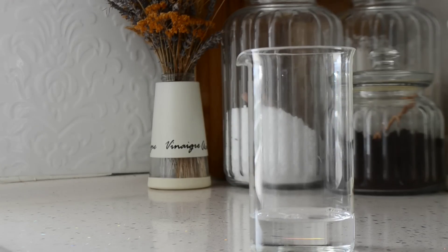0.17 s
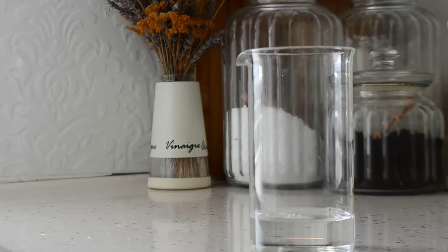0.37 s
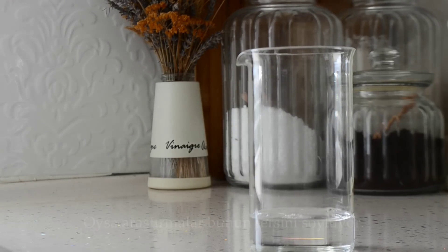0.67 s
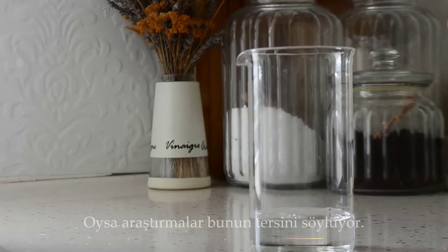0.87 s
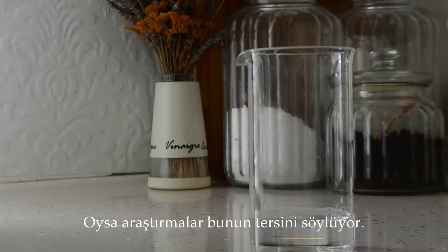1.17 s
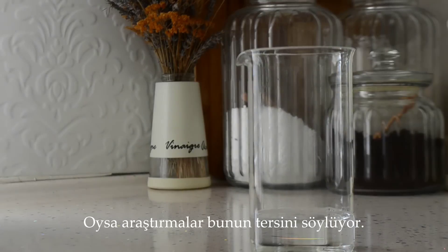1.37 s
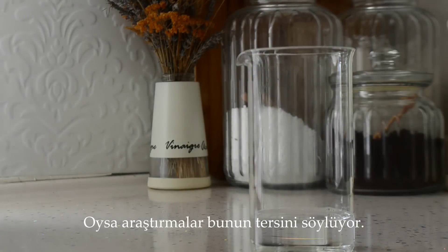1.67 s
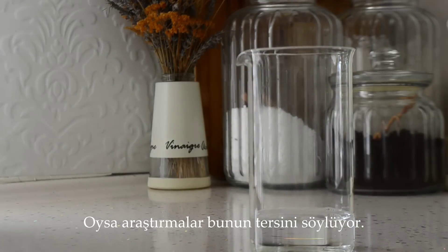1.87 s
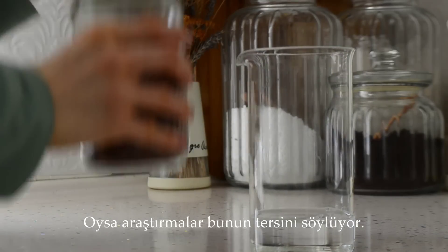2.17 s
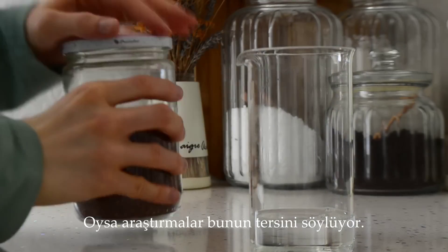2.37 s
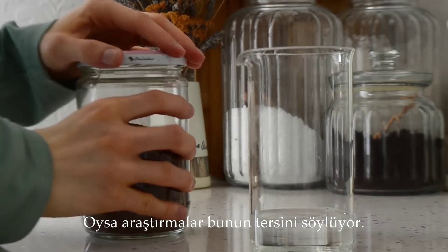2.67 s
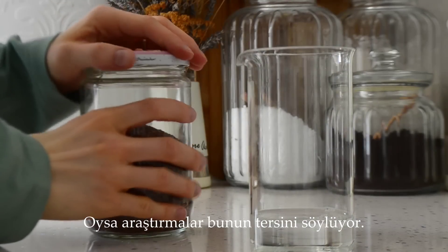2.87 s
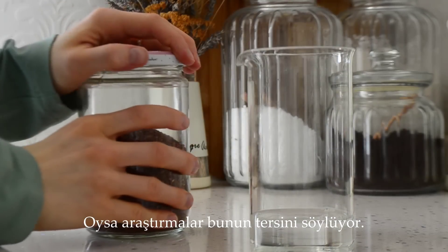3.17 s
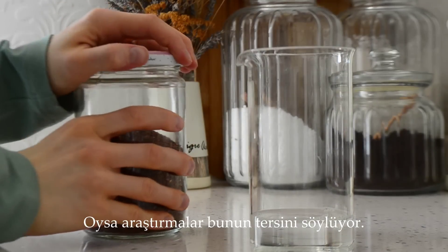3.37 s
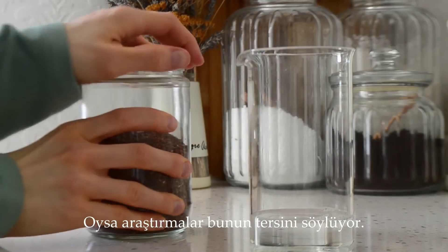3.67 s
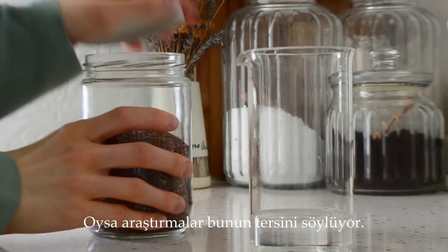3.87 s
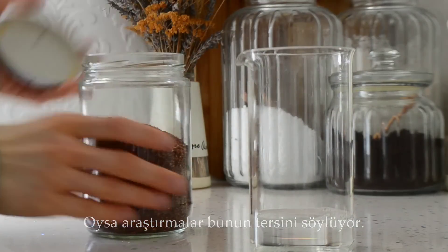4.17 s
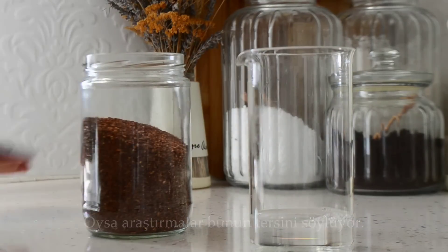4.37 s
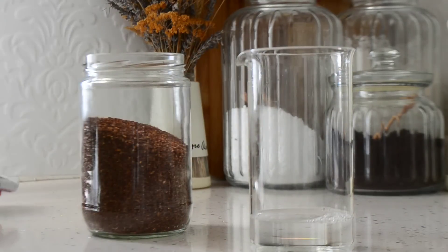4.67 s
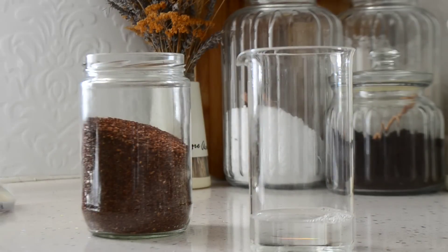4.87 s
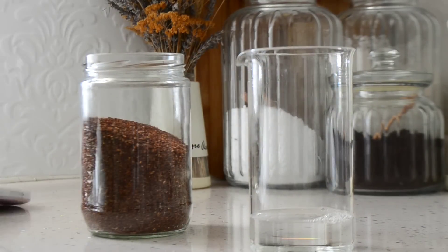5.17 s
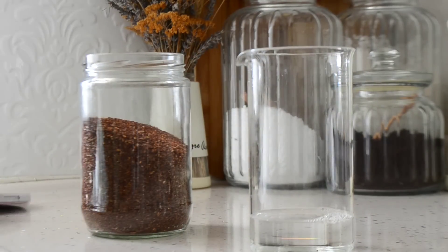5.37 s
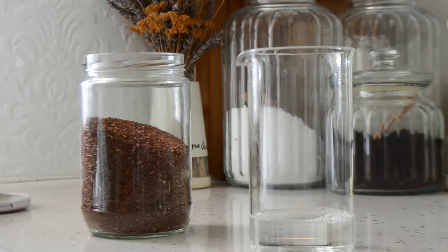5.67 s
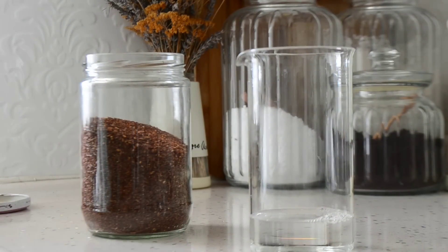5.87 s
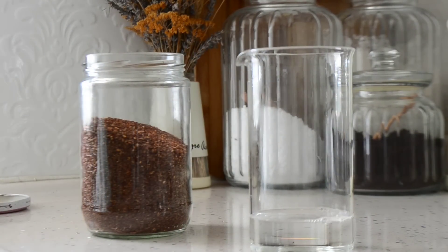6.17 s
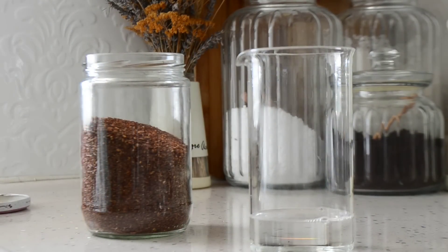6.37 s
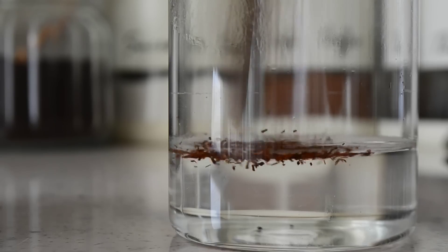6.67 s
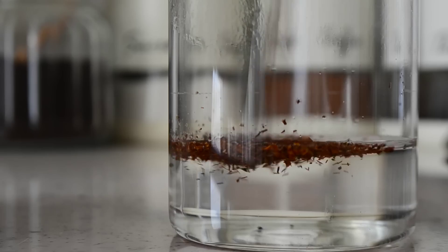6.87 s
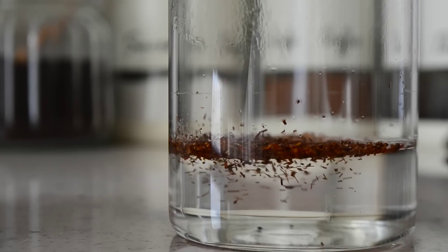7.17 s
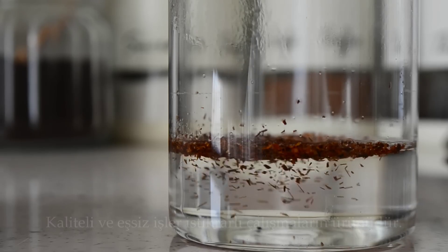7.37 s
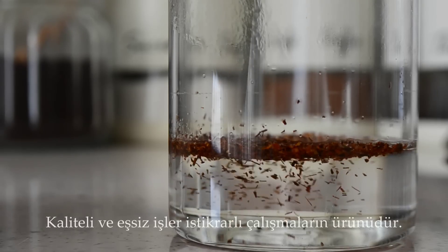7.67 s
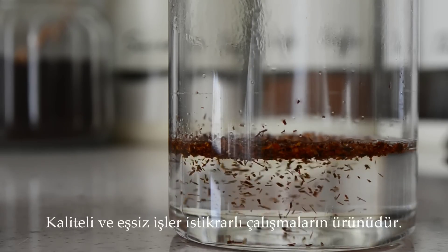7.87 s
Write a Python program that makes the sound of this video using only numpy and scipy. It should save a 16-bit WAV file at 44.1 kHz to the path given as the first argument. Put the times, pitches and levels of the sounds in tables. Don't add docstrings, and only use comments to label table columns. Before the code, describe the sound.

In a quiet kitchen, a jar drags and thuds onto a stone counter, a lid spins down rattling, and flakes patter softly in a glass jug.

```python
import sys
import numpy as np
from scipy import signal
from scipy.fft import rfft, irfft
from scipy.io import wavfile
from scipy.ndimage import uniform_filter1d

SR = 44100
rng = np.random.default_rng(int(sys.argv[2]) if len(sys.argv) > 2 else 0)


def master_out(mix):
    frames = np.transpose(np.atleast_2d(mix))
    ceiling = np.clip(frames, -1, 1)
    pcm = np.round(ceiling * 32767).astype(np.int16)
    wavfile.write(sys.argv[1], SR, pcm)


def volts_from_db(level):
    exponent = np.asarray(level, float) / 20
    return 10 ** exponent


N = 353108
T = np.arange(N) / SR


def level(x, db=0):
    return x * volts_from_db(db) / np.sqrt(np.mean(x ** 2))


def peak(x, db):
    return x * volts_from_db(db) / np.abs(x).max()


def add(out, start_s, x):
    i = int(start_s * SR)
    out[i:i + len(x)] += x


def on_log(hz, table):
    table_hz, value = np.transpose(table)
    return np.interp(np.log(hz + 1), np.log(table_hz), value)


def colour(x, table):
    cepstrum = irfft(np.log(volts_from_db(on_log(np.fft.rfftfreq(4096, 1 / SR), table))))
    cepstrum[1:2048] *= 2
    cepstrum[2049:] = 0
    response = irfft(np.exp(rfft(cepstrum)))
    return signal.oaconvolve(x, response)[:len(x)]


def band(x, lo_hz, hi_hz, order=2):
    edges_hz = [lo_hz, min(hi_hz, .48 * SR)]
    return signal.sosfilt(signal.butter(order, edges_hz, "band", fs=SR, output="sos"), x)


def ring(x, modes):
    t = T[:SR // 2]
    tone = sum(volts_from_db(db) * np.sin(2 * np.pi * hz * t) * volts_from_db(-60 * t / max(t60, .004)) for hz, db, t60 in modes)
    return signal.oaconvolve(x, tone)[:len(x)]


def as_modes(peaks):
    return [(hz, db + 20 * np.log10(width), np.log(1000) / (np.pi * width)) for hz, width, db in peaks]


def curve(table):
    time_s, level_db = np.transpose(table)
    first, last = time_s[0], time_s[-1]
    fade = np.interp(T, [first, first + .02, last - .02, last], [0, 1, 1, 0])
    return fade * volts_from_db(np.interp(T, time_s, level_db))


def swell(start, end, db, rise, fall):
    before = (start - T) / max(rise, .005)
    after = (T - end) / max(fall, .005)
    return volts_from_db(db - 20 * np.maximum(np.maximum(before, after), 0))


def strokes(table):
    return sum(swell(s, s, db, rise, fall) for s, db, rise, fall in table)


def grains(rate, spread_db):
    size_db = spread_db * np.minimum(rng.exponential(size=N), 2.5)
    return level((rng.random(N) < rate / SR) * rng.standard_normal(N) * volts_from_db(size_db))


def walk(rate):
    k = int(SR / rate)
    steps = np.repeat(rng.standard_normal(N // k + 1), k)
    return 1.3 * uniform_filter1d(uniform_filter1d(steps, k), k)[:N]


def jar():
    # time_s, level_db
    jar_blows = [
        (2.5722, 5),
        (2.5765, -2),
        (2.585, -5.5),
        (2.598, -17.5),
        (2.625, -8),
    ]
    # pitch_hz, level_db, t60_s
    slab_modes = [(626, -11, 0.17), (732, 4.5, 0.27), (930, -6.5, 0.28), (1106, -13.5, 0.33),
                  (1178, 2, 0.35), (1267, -0.5, 0.21), (1436, -5.5, 0.37), (1407, 0, 0.44),
                  (1560, -4.5, 0.59), (1670, -2.5, 0.23), (1970, -16.5, 0.36), (2090, -5, 0.26),
                  (2762, -22, 0.23)]
    # pitch_hz, level_db, t60_s
    glass_modes = [(6940, -63, .12), (8220, -60.5, .12), (10450, -65, .1), (13300, -75, .1)]
    # pitch_hz, level_db
    knock_spectrum = [(40, -33), (62, -7), (120, -21), (300, -6.5), (520, -3), (760, 5.5), (1000, -2.5),
                      (1350, -1.5), (1900, -6.5), (2700, -13.5), (3300, -27.5), (6300, -55.5),
                      (15500, -73.5)]
    blows, t = np.zeros(N), T[:SR // 20]
    for s, db in jar_blows:
        after_push = 0.14 * rng.standard_normal(len(t)) * np.exp(-t / 0.0043)
        add(blows, s, volts_from_db(db) * ((t == 0) + after_push))
    damped = [(hz, db, 0.14 * t60) for hz, db, t60 in slab_modes]
    slab_ring = peak(ring(band(blows, 400, 1700), damped), -5)
    glass_ring = ring(peak(blows, -8), glass_modes)
    return slab_ring + glass_ring + peak(colour(blows, knock_spectrum), -1.6)


def drag():
    # time_s, level_db
    pressure = [
        (1.33, -51),
        (1.346, -36.5),
        (1.502, -17),
        (1.576, -28),
        (1.62, -37.5),
        (1.68, -61),
    ]
    # pitch_hz, width_hz, level_db
    shelf = [(142, 43, -2.5), (262, 37, -13), (356, 140, 7), (542, 45, 8), (624, 110, 2), (790, 150, -9.5),
             (1150, 130, -15), (1620, 130, -32), (2600, 360, -27)]
    shelf_modes = as_modes(shelf)
    slips_per_s = 160 * volts_from_db(3 * walk(60))
    slip_db = 5.2 * np.clip(rng.standard_normal(N), -2, 1)
    slips = np.diff(np.floor(np.cumsum(slips_per_s) / SR), prepend=0) * volts_from_db(slip_db)
    hiss = 0.068 * rng.standard_normal(N)
    push = level(band(slips + hiss, 163, 2480, order=3)) * curve(pressure)
    unit_ring = np.linalg.norm(ring(1. * (T == 0), shelf_modes))
    return volts_from_db(-4) * ring(push, shelf_modes) / unit_ring / 3.55


def knocks():
    # time_s, peak_db, body_hz, body_width_octaves
    shelf_knocks = [(0.843, -37.5, 2000, 1.8), (1.177, -25, 266, 1.4), (1.179, -40, 736, 1.5),
                    (1.342, -34.5, 456, 1.6), (1.391, -33, 630, 0.71), (1.519, -19.5, 580, 1),
                    (1.552, -38.5, 2170, 1.6), (1.694, -49, 2400, 0.72)]
    nudges = [(3.24, -45, 384, 1.24), (3.775, -37.5, 556, 1), (3.8, -45, 602, 1.6),
              (4.737, -43.5, 600, 1.9), (4.82, -43, 800, 2.1), (5.167, -38, 290, 1.1),
              (6.011, -34, 930, 1.4)]
    thread_knocks = [(3.452, -33, 895, 1.1), (3.46, -21, 486, 0.77), (3.462, -18, 1140, 0.56),
                     (3.47, -34.5, 2410, 0.17), (3.634, -21.5, 463, 2.58)]
    thread_clicks = [(3.329, -46, 1990, 1.6), (3.48, -25.5, 730, 0.6), (3.504, -24, 1100, 1.47),
                     (3.63, -41, 1710, 2.7), (3.638, -25, 1680, 0.41), (3.642, -48, 3300, 1.2)]
    lid_knocks = [(4.912, -19, 1950, 0.17), (4.914, -23, 915, 0.46), (6.117, -17, 1040, 1.1),
                  (6.119, -21.5, 400, 1.37), (6.135, -23, 1290, 0.92)]
    # knocks, thump_db, crack_db for a 1 kHz body
    kinds = [(shelf_knocks, -34, -41), (nudges, -9, -21), (thread_knocks, -21, -48),
             (thread_clicks, -16.5, -28.5), (lid_knocks, -32, -27)]
    out, t = np.zeros(N), T[:SR // 8]
    thump = band(t * np.exp(-t / 0.00046), 68, 240)
    for table, thump_db, crack_db in kinds:
        for s, db, hz, octaves in table:
            noise = rng.standard_normal(len(t))
            spread = 2 ** (np.clip(octaves, .2, 4) / 2)
            after_push = 0.14 * noise * np.minimum(t / 0.0018, 1) * np.exp(-t * hz / 2.24)
            body = band(0.56 * (t == 0) + after_push, hz / spread, hz * spread)
            crack = band(noise * np.exp(-t / 0.0027), 2300, 7100)
            harder_db = 9.5 * np.log2(hz / 1000)
            add(out, s, peak(body, db) + peak(thump, db + thump_db) + peak(crack, db + crack_db + harder_db))
    return out


def thread_ping():
    out = np.zeros(N)
    graze = 1. * (T[:SR // 4] == 0)
    add(out, 3.812, ring(graze, [(6720, -70, .045)]))
    return out


def contacts():
    # time_s, peak_db, fall_s, treble_db
    taps = [
        (4.9107, -20.5, 0.026, -19),
        (5.0898, -39, 0.025, -34),
        (5.177, -42, 0.013, -20),
        (5.2264, -58, 0.012, -16),
    ]
    # time_s, peak_db
    rocks = [(5.292, -23), (5.384, -22.5), (5.482, -25), (5.543, -22.5), (5.614, -22.5), (5.668, -22.5),
             (5.725, -26), (5.783, -27), (5.808, -25.5)]
    # time_s, peak_db, fall_s, treble_db
    held = [
        (6.012, -40.5, 0.0036, -5),
        (6.049, -41.5, 0.0068, -23),
        (6.0924, -45.5, 0.0055, -3.5),
        (6.1175, -28, 0.0036, 0.5),
        (6.1316, -43, 0.0021, 18),
    ]
    times = np.array(rocks)[:, 0]
    rises = 0.43 * np.diff(times, prepend=2 * times[0] - times[1])
    touches = [(s, db, 0.00067, fall, treble_db, 3.5) for s, db, fall, treble_db in taps]
    touches += [(s - rise, db, rise, 0.0086, -14, 1.2) for (s, db), rise in zip(rocks, rises)]
    touches += [(s, db, .0012, fall, treble_db, -36) for s, db, fall, treble_db in held]
    return touches


def lid():
    lid_hz = [867, 1170, 1195, 1405, 1453, 1674, 1960, 2121, 2600, 2645, 2930, 3300, 3375, 3545, 3797, 4091,
              4300, 4850, 5215, 6150, 6470, 6750, 7850, 8520, 9640, 10500, 11700, 12600]
    # level_db, t60_s
    lid_ringing = [(-8.5, 0.24), (-14, 0.45), (-7, 0.32), (-5, 0.24), (1, 0.22), (-16, 0.055), (-26, 0.12),
                   (-13.5, 0.33), (-2, 0.2), (-5.5, 0.11), (-14, 0.11), (-9, 0.17), (-8, .12), (-8, 0.074),
                   (-19, .6), (-2, 0.09), (-14, 0.045), (-31, 0.043), (-10, 0.17), (-22, 0.5), (-13, 0.06),
                   (-28, 0.1), (-20, 0.24), (-22, .09), (-25, 0.07), (-20, 0.08), (-22, 0.07), (-23, 0.07)]
    # pitch_hz, level_db
    scrape_spectrum = [(180, -63), (300, -10.5), (985, -10), (1420, 0), (2250, -9.5), (2560, -3.5),
                       (2790, -15), (3400, -5.5), (5760, -30), (15500, -40)]
    force, free, bright, t = np.zeros(N), np.zeros(N), np.zeros(N), T[:SR // 8]
    for s, db, rise, fall, treble_db, ring_db in contacts():
        rise = max(rise, .0005)
        shape = volts_from_db(db) * np.where(t < rise, t / rise, np.exp(-(t - rise) / max(fall, .001)))
        add(force, s, shape)
        add(free, s, shape * volts_from_db(ring_db))
        burst = np.minimum(t / 0.00088, 1) * np.exp(-t / max(1.05 * fall, .001))
        add(bright, s + .6 * rise, volts_from_db(db + treble_db) * burst)
    grit = grains(9000, 1.7)
    skid_gain = swell(start=5, end=5, db=-28, rise=0.04, fall=0.08)
    roll_gain = swell(start=5.3, end=5.5, db=-31, rise=0.08, fall=0.1)
    rolling = volts_from_db(-8) * band(grit, 330, 2920, order=3) * (skid_gain + roll_gain)
    modes = [(hz, db, t60) for hz, (db, t60) in zip(lid_hz, lid_ringing)]
    tin = ring(grit * free + rolling, modes) / np.std(ring(grit, modes))
    scrape = colour(grit * force + rolling, scrape_spectrum) / np.std(colour(grit, scrape_spectrum))
    fine_grit = level(band(grains(4900, 3.4), 5500, 12100))
    sizzle = (bright + volts_from_db(-15) * roll_gain) * fine_grit
    return volts_from_db(-10) * tin + volts_from_db(-6.5) * scrape + volts_from_db(-6) * sizzle


def lid_hollow():
    pitch_hz = 262 * (1 + 0.0059 * walk(30.44))
    tone = np.sin(2 * np.pi * np.cumsum(pitch_hz) / SR) * volts_from_db(walk(40) - 8)
    return tone * swell(start=5.89, end=6.1, db=-36, rise=.5, fall=.02)


def counter_rumble():
    landing = swell(start=5.158, end=5, db=-46, rise=0.6, fall=0.5)
    pressing = swell(start=5.5, end=6, db=-35, rise=-0.2, fall=0.37)
    return level(band(grains(1500, 0.75), 86, 800, order=3), -8) * (landing + pressing)


def counter_bending(blows):
    # pitch_hz, level_db, t60_s
    counter_modes = [(168, -26, 0.83), (60.3, -24, 0.4), (101.4, -21, 0.5)]
    on_counter = blows * (T > 2)
    return volts_from_db(-24) * ring(on_counter, counter_modes)


def leaves():
    # pitch_hz, width_hz, level_db
    jug = [(4470, 30, -3), (5270, 89, -12), (5800, 33, 1), (6500, 54, -10), (7030, 52, -7),
           (7640, 160, -10), (8560, 32, 0), (8960, 52, -10), (9690, 38, -4), (10300, 31, -4),
           (12600, 47, -15), (12670, 100, -10)]
    flakes = grains(1100, 2.4)
    jug_ring = level(ring(flakes, as_modes(jug)), -11)
    ticks = level(band(flakes, 5900, 14000), -13.5)
    return (jug_ring + ticks) * swell(start=6.61, end=6.76, db=-66, rise=.12, fall=.35)


def sleeves():
    # time_s (fastest), level_db, rise_s, fall_s
    cloth = [(.3, -77, .2, .2), (.835, -67.5, 0.19, .15), (1.16, -66, 0.23, .5), (1.36, -62, .25, 0.42),
             (1.55, -79, .05, 0.037), (3.05, -77.5, .1, .2), (3.33, -72, .02, .03), (4.35, -65, 0.28, 0.4),
             (4.89, -61, 0.094, 0.022), (6.3, -74, .1, .15), (6.78, -80, .15, .1), (7.97, -71, .12, .1)]
    rubs = [(0.01, -55.5, 0.03, 0.77), (.52, -68, .2, 0.13), (.84, -52.5, 0.13, 0.47),
            (1.16, -61, 0.092, 0.045), (2.86, -41, 0.011, 0.1), (3.1, -54.5, .2, 0.72),
            (3.43, -52, 0.09, 0.016), (4.0, -53, .1, 0.24), (4.34, -57, .15, 0.26), (4.8, -60, .2, 0.38),
            (6.3, -71.5, .1, 0.36), (6.64, -56.5, 0.31, .3), (8.0, -58, 0.11, .1)]
    creaks = [
        (.56, -68, 0.11, 0.087),
        (7.3, -73, 0.28, 0.22),
    ]
    flutter = volts_from_db(1.3 * walk(25))
    hiss = level(band(grains(9000, 2.3), 5100, 13000), -10.5) * flutter
    swish = level(band(grains(6000, 2.0), 1000, 3330), -3) * flutter
    rub = level(band(grains(3000, 1.5), 100, 1200, order=3), -4)
    creak = level(band(grains(2000, 1.8), 3200, 3840))
    return (hiss + swish) * strokes(cloth) + rub * strokes(rubs) + creak * strokes(creaks)


def room(x):
    # pitch_hz, t60_s
    room_t60 = [(60, 0.59), (150, 0.61), (500, 0.33), (1500, 0.46), (4000, .35), (8000, 0.083),
                (15000, 0.1)]
    t, tail = T[:SR], 0
    for hz in 45 * 2. ** np.arange(0, 9, .5):
        t60 = on_log(hz, room_t60)
        part = band(rng.standard_normal(len(t)), hz / 2 ** .25, hz * 2 ** .25)
        tail = tail + part * volts_from_db(-60 * t / t60) / np.sqrt(t60)
    tail = tail * np.clip((t - .003) / 0.0048, 0, 1)
    return signal.oaconvolve(x, tail / np.sqrt(np.sum(tail ** 2)))[:N]


def kitchen():
    # pitch_hz, level_db
    air_spectrum = [(15, -26), (25, 0.5), (59, -2.5), (129, -2.5), (160, -10.5), (194, 2), (282, -5),
                    (446, -6), (584, -5), (686, -9.5), (2240, -16), (3640, -25.5), (7140, -38.5),
                    (14400, -42), (15600, -44.5)]
    # pitch_hz, width_hz, level_db
    fridge_peaks = [(54.1, 10, 4.5), (188.7, 12, 8.5), (695, 92, -18.5), (1019, 193, 3.5),
                    (2846, 190, -9.5), (3145, 37, -10.5), (3630, 40, -9), (4440, 91, -20.5),
                    (5230, 39, -14)]
    air_db = -56.5
    air = level(colour(rng.standard_normal(N), air_spectrum), air_db - 1.5) * volts_from_db(walk(3.3) / 2)
    fridge = level(ring(rng.standard_normal(N), as_modes(fridge_peaks)), air_db - 6) * volts_from_db(walk(3.7))
    traffic_db = -45 - 20 * T / .4
    traffic = level(band(rng.standard_normal(N), 25, 105), -0.5) * volts_from_db(traffic_db)
    whine = np.sqrt(2) * volts_from_db(-85) * np.sin(2 * np.pi * 15677 * T)
    return air + fridge + traffic + whine


def scene():
    landed, knocked = jar(), knocks()
    rubbed = drag() + lid() + thread_ping() + leaves() + sleeves()
    bending = counter_bending(knocked + landed)
    walls = room(knocked + volts_from_db(-1.5) * landed + volts_from_db(-4) * rubbed)
    mix = landed + knocked + rubbed + lid_hollow() + counter_rumble() + bending + walls + kitchen()
    return mix[None]


def roll_off(x):
    return signal.sosfilt(signal.butter(12, 15750, fs=SR, output="sos"), x)


def record(dry):
    heard = signal.sosfilt(signal.butter(5, 42, "high", fs=SR, output="sos"), dry)
    return roll_off(np.clip(heard, -1, 1))


dry = scene()
out = record(dry)
master_out(out)
```